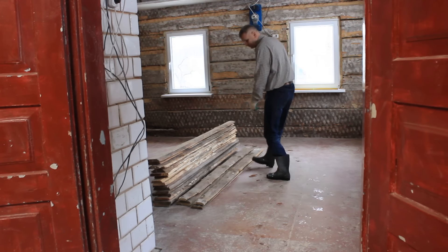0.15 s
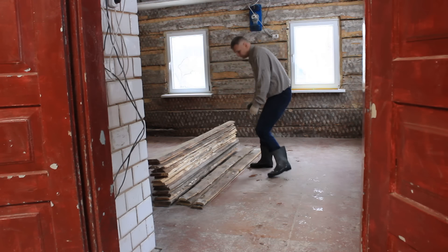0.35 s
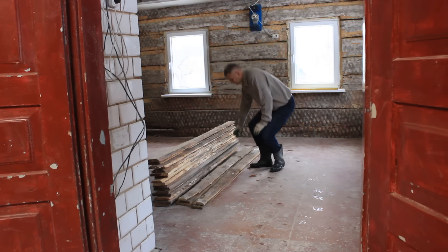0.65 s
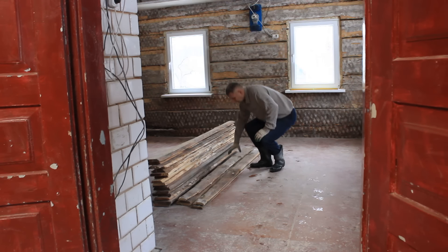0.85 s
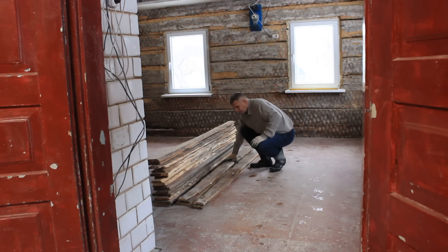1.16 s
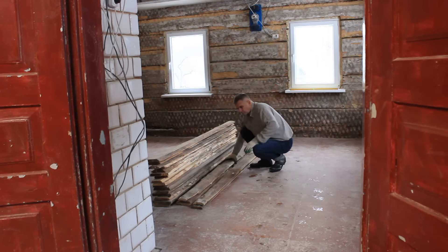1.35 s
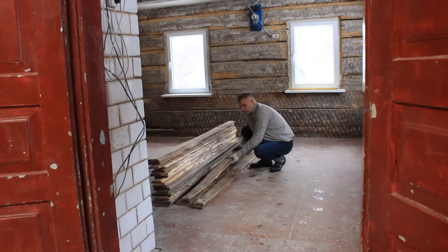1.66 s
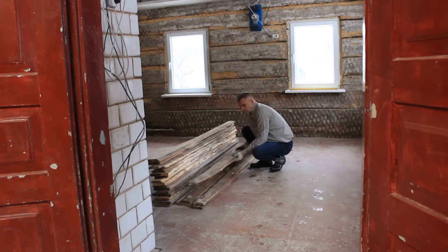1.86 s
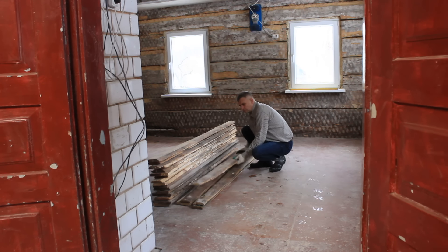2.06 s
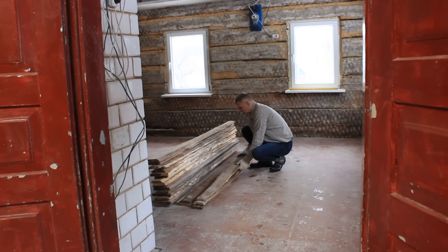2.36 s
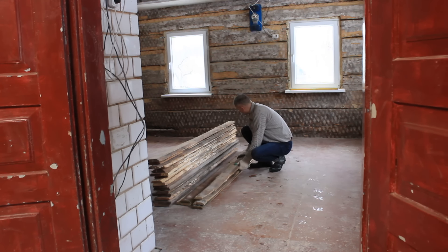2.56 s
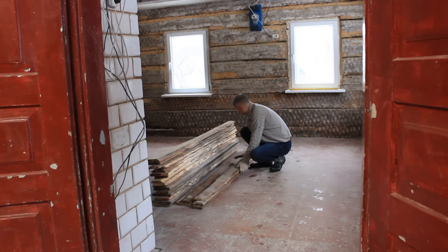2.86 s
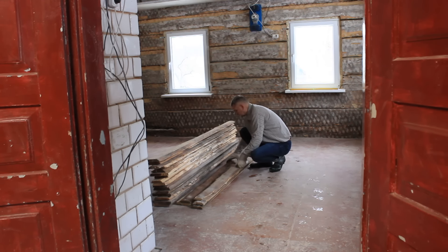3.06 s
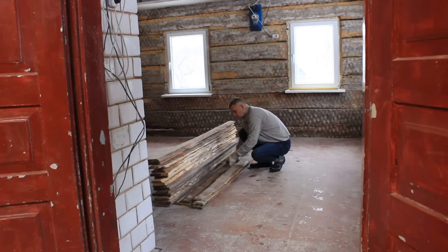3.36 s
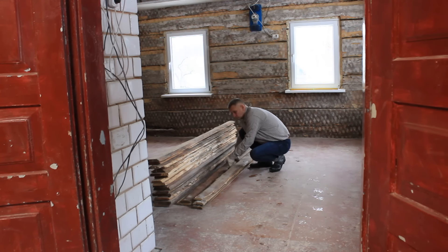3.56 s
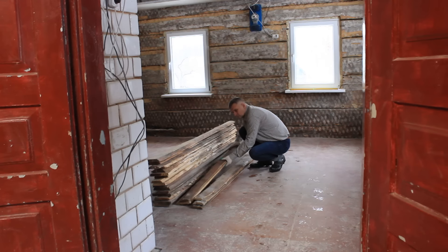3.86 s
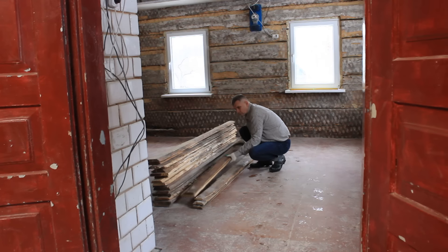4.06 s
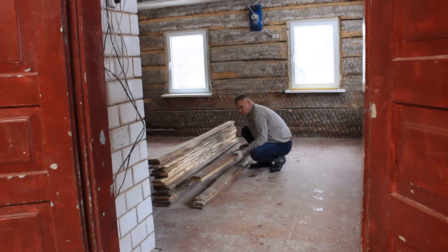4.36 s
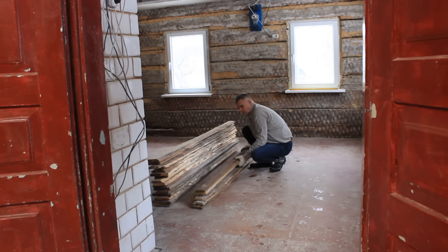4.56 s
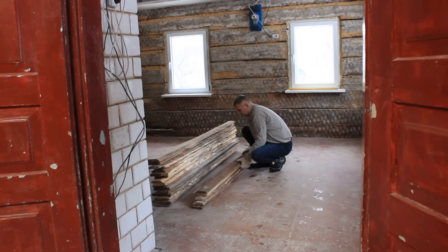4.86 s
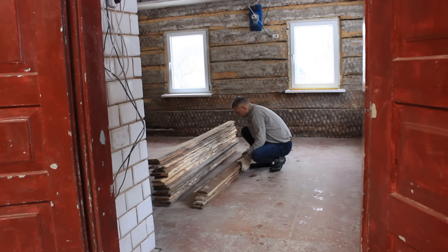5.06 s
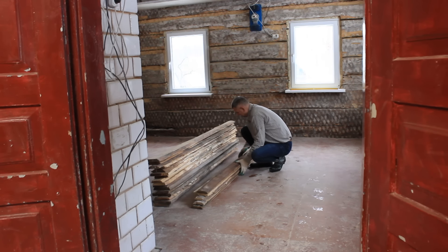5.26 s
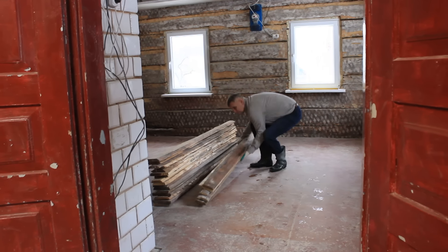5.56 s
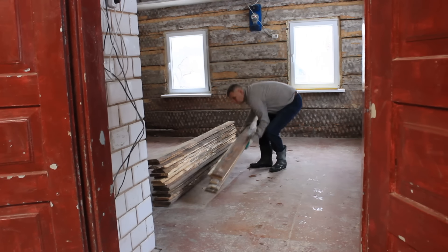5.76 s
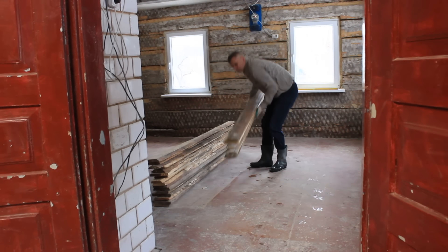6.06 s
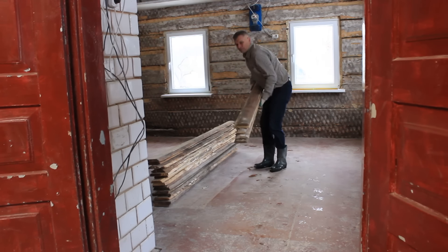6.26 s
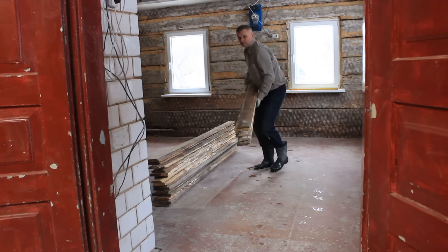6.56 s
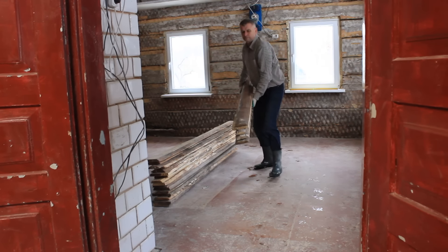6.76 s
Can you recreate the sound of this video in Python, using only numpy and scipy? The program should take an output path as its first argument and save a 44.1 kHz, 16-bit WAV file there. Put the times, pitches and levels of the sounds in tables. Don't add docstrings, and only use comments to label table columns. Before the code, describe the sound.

In an empty wooden room, weathered boards are pulled from a stack with sharp clacks, splinter snaps, gritty scraping and short reverberation over faint hiss.

```python
import sys
import numpy as np
from scipy import signal
from scipy.fft import rfft, irfft, next_fast_len
from scipy.io import wavfile
from scipy.ndimage import uniform_filter1d, map_coordinates

SR = 44100
rng = np.random.default_rng(int(sys.argv[2]) if len(sys.argv) > 2 else 0)


def to_linear_factor(level_db):
    exponent = np.asarray(level_db, float) / 20
    return 10 ** exponent


def generate_wav(signal):
    frames = np.transpose(np.atleast_2d(signal))
    scaled = np.clip(frames, -1, 1) * 32767
    pcm = np.round(scaled).astype(np.int16)
    wavfile.write(sys.argv[1], SR, pcm)


N = 304489
SPAN = 20480
HZ = np.fft.rfftfreq(2 * SPAN, 1 / SR)

# (time [s], peak level [dB], weight 600-1800 Hz [dB], brightness 7-15 kHz [dB], ring of the piece [Hz])
SNAPS = [(0.8203, -28.5, -3.5, -1.5, 760), (1.0413, -15.5, -15.5, -5, 3080), (1.7424, -39, -14, -15, 4100),
         (2.16, -34.5, -4, 1, 1270), (2.405, -40.5, -16, -9, 5670), (3.7902, -42.5, 1.5, -8, 700),
         (4.5116, -36, 1.5, -3.5, 2850), (4.6387, -27.5, 2.5, -12, 3000), (5.657, -20.5, -10.5, -12, 935),
         (6.2898, -34.5, -9, -6.5, 2340), (6.296, -33.5, 7, -11, 1270)]
# (time [s], peak level [dB], weight [dB], brightness [dB])
CRACKLES = [(0.0857, -48, -6.5, -2), (0.2902, -55.5, 10, -22), (0.3355, -44, -2, -19),
            (1.697, -50, -1, -12), (1.7184, -61.5, -25, 12), (1.99, -65, -6, -9), (2.5526, -50.5, 7.5, -32),
            (3.7514, -51, 0, -21), (4.0543, -55, -26, -3), (4.3779, -61, -10, -2), (5.75, -62, -5, -20),
            (5.8386, -47.5, -11, -1), (5.9853, -54.5, 3.5, -17), (6.1482, -56, 8, -7),
            (6.5575, -50, -22, -9)]
# (time [s], peak level [dB], brightness [dB], length [s])
SCUFFS = [(0.29, -60, -15, 0.15), (0.3426, -50, 0.5, 0.2), (0.583, -43.5, 0.5, 0.2),
          (0.6125, -41.5, -15, 0.19), (1.3233, -50, -17, 0.18), (1.756, -47, -33, 0.2),
          (3.1136, -51, -9, 0.087), (3.3743, -53.5, -9, 0.19), (3.433, -49, -11, 0.097),
          (3.8594, -48, -12, 0.2), (4.106, -47.5, -9, 0.2), (6.1437, -44.5, -11, 0.069),
          (6.214, -53, -6, 0.06)]
# (frequency [Hz], width
# [Hz], level [dB])
SPLINTER_MODES = [(161, 25, 8), (680, 140, -9.5), (970, 130, -25), (1390, 130, 0.5), (1810, 170, 0.5),
                  (2400, 53, -3), (2990, 360, -4), (4200, 48, 0), (4700, 500, -5.5), (5740, 250, -3),
                  (6300, 440, -6.5), (7200, 480, -9)]
# (time [s], peak level [dB], floor thump 50-160 Hz [dB], body 170-420 Hz [dB])
KNOCKS = [(0.578, -35.5, -2, 2.5), (0.623, -36, -8, -7), (2.764, -12.5, -27, -21.5),
          (2.7732, -10.5, -23, -15), (2.7804, -17.5, -14, -34), (2.81, -27, -14, -4),
          (3.954, -53, 1, -25.5), (4.157, -39, 4.5, -1), (4.667, -21, -16, 1), (4.679, -19, -18, -9),
          (4.697, -27.5, -0.5, -4), (4.731, -27, -12, 3.5), (4.76, -32.5, -24, 6.5), (4.798, -43, 8, -11),
          (4.94, -21.5, -7.5, 2), (5.034, -37, 0, 5), (5.052, -38.5, -1, 3), (5.124, -41.5, -4.5, 13),
          (5.143, -48, -2, 17), (6.305, -14.5, -78, -15.5), (6.315, -12.5, -57, -25),
          (6.329, -13.5, -45, -15.5), (6.345, -29, -44, -21), (6.388, -22, -41, -19),
          (6.529, -34, -31, -2.5), (6.568, -40, -19, -12), (6.61, -50, -21, -8)]
# (time [s], peak level [dB], floor thump [dB], body [dB], edge 2-5 kHz [dB])
THUDS = [(0.233, -45, 2, 5, -5), (0.344, -41, -2.5, -5.5, 4.5), (1.486, -67, 15, 18, -15),
         (1.512, -59.5, 12, 14.5, -1), (1.568, -45, 1.5, -9.5, -8), (2.413, -40, 2.5, -3.5, 2.5),
         (2.673, -30, -15, -21, -42), (2.681, -21, -13, -18, -20), (2.859, -22, -11.5, -7, -11.5),
         (3.123, -55, 10, 9.5, 10), (3.274, -63, 16.5, 18, -21), (4.104, -39, -24, 5.5, -9),
         (4.109, -32.5, -16, -1, -5), (4.657, -26.5, -11, -20, -22), (4.927, -36, -8, 7, 4),
         (4.984, -34, -6, 2.5, -2), (5.083, -49.5, 18, 4, -16), (5.468, -58.5, 4, 10, 10.5),
         (5.826, -59, -49, -16, 5)]
# (frequency [Hz], width [Hz], level [dB])
BOARD_MODES = [(414, 13, 2), (446, 13, 7.5), (556, 71, 2.5), (656, 22, -0.5), (792, 11, -3),
               (910, 55, -3.5), (1025, 30, 5.5), (1177, 130, 0), (1392, 14, 4), (1670, 40, -20),
               (2016, 20, 4), (2552, 21, -18)]
# (frequency [Hz], width [Hz], level [dB])
AIR_MODES = [(68.8, 6.6, 8.5), (102.8, 3.5, 5), (163, 16, 5), (229.5, 4.1, -3.5), (305, 6.3, -14.5)]
# (time [s], friction level [dB], fineness of the grit [dB])
RUBBING = [(0.0, -58, -14.5), (1.23, -52, 10), (2.15, -58, -2), (2.44, -64, -8), (2.75, -46.5, 6),
           (2.86, -53, -9), (3.17, -50.5, -3.5), (4.5, -53, 1), (4.65, -72, 9), (4.77, -53, 0),
           (4.88, -59, 0), (5.03, -52, -24), (5.51, -58.5, 1), (6.15, -46, 7.5), (6.34, -35, -1),
           (6.57, -50.5, -7), (6.71, -54, -1), (6.9, -68, -10)]
# (start [s], length [s], level [dB])
SLIDES = [
    (0.652, 0.064, -57),
    (2.834, 0.18, -36.5),
    (4.177, 0.033, -37),
    (4.957, 0.11, -37.5),
    (6.297, 0.11, -67),
]
# (frequency [Hz], level per Hz [dB])
DRAG_TONE = [(30, -13), (100, -8.5), (300, -6.5), (900, -9.5), (1800, -81), (4000, -65)]
# (frequency [Hz], level per Hz [dB])
GRIT_TONE = [(500, -23), (1200, 0.5), (2500, -3.5), (3600, -4), (5500, -15.5), (8000, -28), (14000, -58)]
# (frequency [Hz], level per Hz [dB])
DUST_TONE = [(3000, -37), (7000, -2.5), (12000, -10), (16000, -13.5)]
# (start [s], end [s], pitch [Hz], width [Hz], level [dB])
SQUEAKS = [
    (1.782, 1.875, 2280, 90, -49),
    (1.79, 1.86, 1370, 40, -55),
    (1.79, 1.82, 3050, 90, -53),
    (1.832, 1.875, 890, 30, -52),
    (6.21, 6.285, 2840, 45, -42),
    (6.232, 6.292, 2250, 22, -41),
]
# (time [s], level [dB], pitch [Hz])
TICKS = [
    (2.407, -42, 14500),
    (2.867, -48.5, 7600),
    (4.001, -53.5, 11000),
    (4.967, -51, 10000),
    (6.645, -45.5, 13800),
]
# (frequency [Hz], time to fall by 60 dB [s])
WALLS = [(60, 0.99), (200, 0.41), (700, 0.48), (2000, 0.33), (5000, 0.36), (12000, 0.19)]
# (frequency [Hz], level per Hz [dB])
HISS_TONE = [(12, -42), (20, -1), (30, -7), (49, -21), (160, -22), (289, -14.5), (535, -6), (1650, -14),
             (2180, -13.5), (8890, -19), (15200, -21.5), (16500, -34)]
# (time [s], length [s], empty above [Hz])
TREBLE_GAPS = [(.961, .012, 7000), (1.010, .02, 5000), (1.587, .012, 7000), (2.283, .01, 5000),
               (2.381, .016, 3000), (2.421, .012, 6500), (2.650, .034, 4500), (2.934, .014, 6000),
               (3.027, .012, 6500), (3.260, .012, 5000), (3.421, .01, 8000), (3.933, .01, 9000),
               (4.257, .014, 5500), (4.397, .012, 5500), (5.673, .014, 7000), (6.116, .014, 6000),
               (6.603, .014, 5500)]


def snaps():
    contact_s, low_under_weight_db = 0.003, -6
    piece_db, piece_q = 4, 3.3
    scuff_low_db, scuff_weight_db = -5.5, -8.5
    contacts = []
    for s, db, weight_db, bright_db, *pitches in SNAPS + CRACKLES:
        piece = [(hz, hz / piece_q, piece_db) for hz in pitches]
        contacts.append((s, db, weight_db + low_under_weight_db, weight_db, bright_db, contact_s, piece))
    for s, db, bright_db, length_s in SCUFFS:
        contacts.append((s, db, scuff_low_db, scuff_weight_db, bright_db, length_s, []))

    out = np.zeros(N + SPAN)
    for s, db, low_db, weight_db, bright_db, length_s, piece in contacts:
        colour = [(60, low_db - 12.5), (280, low_db + 7.0), (450, low_db + 8.0),
                  (800, weight_db + 5.5), (1500, weight_db + 4.0), (3000, -4.0), (5500, -7),
                  (10000, bright_db - 6), (14500, bright_db - 18.5), (17000, bright_db - 28)]
        ring = resonant(SPLINTER_MODES + piece, base=0.73, scatter_db=2.5)
        answer = room(2.5, -1.24, 0.1, 0.5 * length_s)
        add_contact(out, s + 0.0007, db, to_linear_factor(along(colour, HZ)) * ring, answer, (2000, 6000))
    return out[:N]


def knocks():
    knock_edge_db, knock_s, thud_s = -8.5, 0.0026, 0.0147
    blows = [(*row, knock_edge_db, knock_s) for row in KNOCKS]
    blows += [(*row, thud_s) for row in THUDS]

    out = np.zeros(N + SPAN)
    for s, db, thump_db, body_db, edge_db, contact_s in blows:
        colour = [(25, thump_db - 0.5), (45, thump_db), (69, thump_db + 8.5), (85, thump_db + 4.5),
                  (120, thump_db + 12.5), (280, body_db + 10.5), (600, 1.0), (1300, -1.5),
                  (2500, edge_db - 4.5), (4200, edge_db - 25), (8000, edge_db - 41), (16000, edge_db - 43)]
        ring = resonant(BOARD_MODES + AIR_MODES, base=0.85, scatter_db=2)
        answer = room(-2.5, 0.6, 0.055, contact_s)
        add_contact(out, s - 0.001, db, to_linear_factor(along(colour, HZ)) * ring, answer, (500, 1600))
    return out[:N]


def sliding(t):
    rise_db_per_s, fall_db_per_s = 314, 217
    total = np.zeros(N)
    for start, length, db in SLIDES:
        rise = rise_db_per_s * (t - start)
        fall = fall_db_per_s * (start + length - t)
        total += to_linear_factor(db + np.minimum(0, np.minimum(rise, fall)))
    return total


def rubbing():
    t = np.arange(N) / SR
    s, friction, fineness = np.transpose(RUBBING)
    friction_db = np.interp(t, s, friction)
    fine_db = np.interp(t, s, fineness)
    slide = sliding(t)
    drag = to_linear_factor(friction_db - 6 - 0.6 * fine_db) + slide
    grit = to_linear_factor(friction_db - 2) + to_linear_factor(-20) * slide
    dust = to_linear_factor(friction_db - 18 + fine_db)

    out = np.zeros(N)
    for gain, tone in ((drag, DRAG_TONE), (grit, GRIT_TONE), (dust, DUST_TONE)):
        clumps = map_coordinates(rng.standard_normal(300), [t * 30])
        bursts = np.minimum(rng.exponential(size=N // 64 + 1), 5)
        bursts = np.repeat(bursts, 64)[:N]
        grains = rng.standard_normal(N) * to_linear_factor(3.5 * np.clip(clumps, -2, 2) + 1.8 * bursts)
        answer = irfft(room(-8.5, -9.5, 0.049))[:SPAN]
        wet = signal.fftconvolve(grains, answer)[:N]
        out += gain * coloured(wet, tone)
    return out


def squeaks():
    t, out = np.arange(N) / SR, np.zeros(N)
    for start, end, hz, width_hz, db in SQUEAKS:
        stroke = np.clip(np.minimum(t - start, end - t) / 0.026, 0, 1)
        drift = np.cumsum(rng.standard_normal(N)) * np.sqrt(2 * np.pi * width_hz / SR)
        out += to_linear_factor(db) * stroke * np.sin(2 * np.pi * hz * t + drift)
    return out


def ticks():
    out = np.zeros(N + SPAN)
    for s, db, hz in TICKS:
        colour = [(0.1 * hz, -30), (0.69 * hz, -6), (hz, 0), (1.2 * hz, -10)]
        answer = room(-26, 1.5, 0.03, 0.0008)
        add_contact(out, s, db, to_linear_factor(along(colour, HZ)), answer, (3000, 17000))
    return out[:N]


def add_contact(out, s, db, gain, answer, band_hz):
    total = np.cumsum(np.abs(answer) ** 2)
    k = np.arange(len(HZ))
    lo = np.maximum(k * 4 // 5 - 20, 0)
    hi = np.minimum(k * 5 // 4 + 20, k[-1])
    room_power = (total[hi] - total[lo]) / (hi - lo)
    z = causal(gain / np.sqrt(room_power)) * answer
    inside = irfft(z * (HZ > band_hz[0]) * (HZ < band_hz[1]))[:SR // 16]
    peak = np.sqrt(uniform_filter1d(inside ** 2, size=300).max())
    out[round(s * SR):][:SPAN] += to_linear_factor(db) / peak * irfft(z)[:SPAN]


def resonant(peaks, base, scatter_db):
    power = base ** 2
    for centre, width, db in peaks:
        strength = to_linear_factor(db + rng.normal(0, scatter_db)) ** 2
        power = power + strength / (1 + (2 * (HZ - centre) / width) ** 2)
    return np.sqrt(power)


def room(early_db, late_db, early_t60, contact_s=0.00105):
    hz, t, z = signal.stft(rng.standard_normal(SPAN), SR, nperseg=256)
    fade = to_linear_factor(-60 * t / along(WALLS, hz)[:, None])
    tail = signal.istft(z * fade, SR, nperseg=256)[1][:SPAN]
    t = np.arange(SPAN) / SR
    u = t / np.clip(contact_s, 0.0001, 0.08)
    swell = 1 - np.exp(-u)
    direct = rng.standard_normal(SPAN) * np.sqrt(u) * np.exp(-2 * u)
    direct[round(contact_s * SR / 4)] -= 0.45 * np.linalg.norm(direct) * np.exp(-contact_s / 0.02)
    early = rng.standard_normal(SPAN) * np.abs(rng.standard_normal(SPAN))
    early *= to_linear_factor(-60 * t / early_t60) * swell
    tail *= swell * (1 - np.exp(-t / 0.00083))
    total = np.zeros(SPAN)
    for db, part in ((0, direct), (early_db, early), (late_db, tail)):
        total += to_linear_factor(db) * part / np.linalg.norm(part)
    return rfft(total, 2 * SPAN)


def causal(gain):
    c = irfft(np.log(gain + 1e-6))
    c[1:SPAN] *= 2
    c[SPAN + 1:] = 0
    return np.exp(rfft(c))


def coloured(x, tone):
    m = next_fast_len(N + 8192)
    gain = to_linear_factor(along(tone, np.fft.rfftfreq(m, 1 / SR)))
    return unit(irfft(rfft(x, m) * gain, m)[:N])


def along(points, hz):
    f, v = np.transpose(points)
    return np.interp(np.log(hz + 1), np.log(f + 1), v)


def unit(x):
    return x / np.sqrt(np.mean(x ** 2) + 1e-20)


def hiss():
    return to_linear_factor(-55) * coloured(rng.standard_normal(N), HISS_TONE)


def scene():
    return (snaps() + knocks() + rubbing() + squeaks() + ticks())[None]


def thin_treble(x):
    top_hz = 15900
    hz, t, z = signal.stft(x, SR, nperseg=768, noverlap=672)
    treble = np.abs(z[:, (hz > 9000) & (hz < top_hz)]).mean(axis=1, keepdims=True)
    z[:, hz > top_hz] *= treble > to_linear_factor(-69)
    z[:, hz > 17000] = 0
    for s, length, edge_hz in TREBLE_GAPS:
        survival = 0.03 + 0.97 / (1 + (hz / (0.85 * edge_hz)) ** 7)
        lost = rng.random(len(hz)) > survival
        z[..., np.abs(t - s) < length / 2 + 0.004] *= 1 - 0.97 * lost[:, None]
    return signal.istft(z, SR, nperseg=768, noverlap=672)[1][:, :N]


def roll_off(x):
    return signal.sosfilt(signal.butter(12, 17140, fs=SR, output="sos"), x)


def record(dry):
    x = dry + hiss() + 0.00097
    x = x / (1 + np.abs(x / 1.05) ** 8) ** (1 / 8)
    mix = thin_treble(x)
    return roll_off(mix)


dry = scene()
out = record(dry)
generate_wav(out)
```